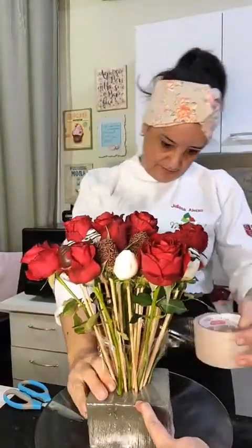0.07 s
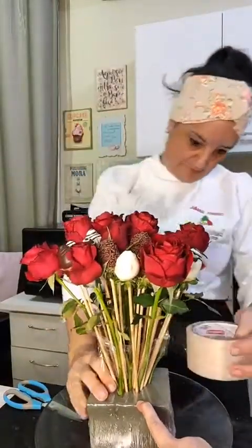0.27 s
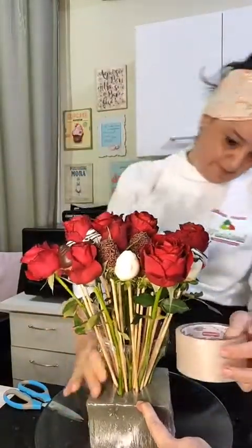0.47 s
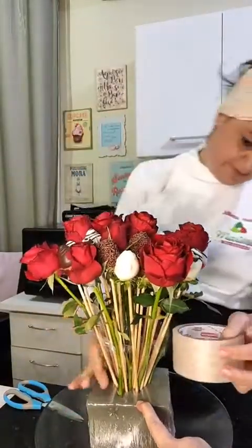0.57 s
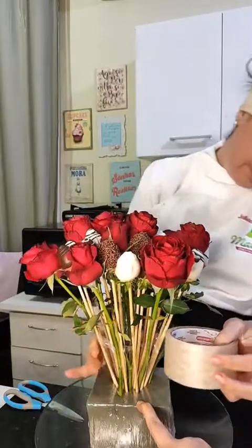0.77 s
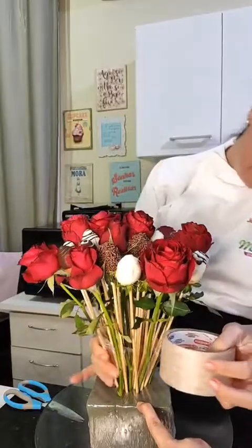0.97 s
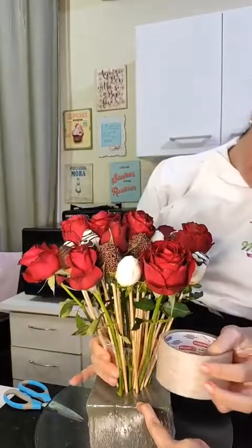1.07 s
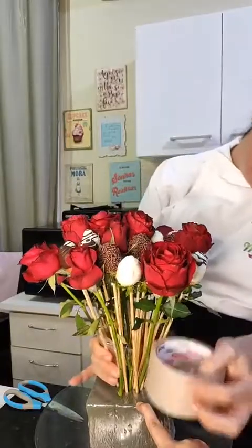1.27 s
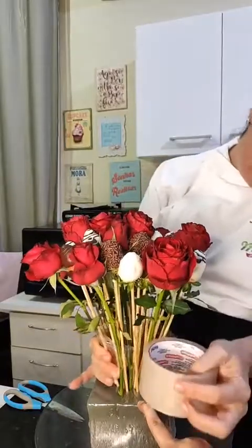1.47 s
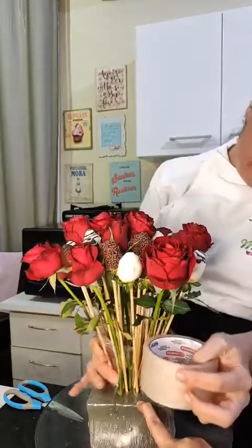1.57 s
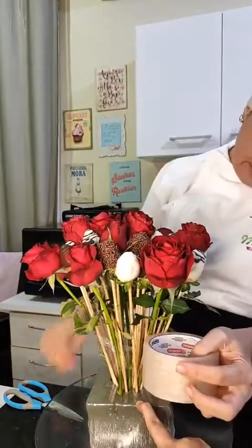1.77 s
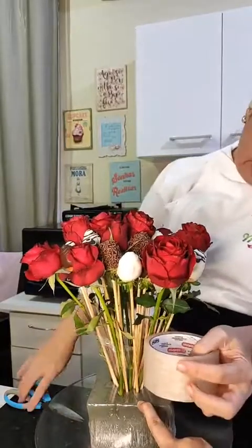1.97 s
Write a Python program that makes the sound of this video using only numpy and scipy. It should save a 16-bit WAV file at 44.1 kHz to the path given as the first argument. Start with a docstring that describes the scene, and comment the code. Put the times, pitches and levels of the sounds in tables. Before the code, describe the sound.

Wide sticky tape is already being yanked off its roll, a loud raspy rip, then light crinkling, ticks and rubbing on stems, then a second harsh rip and faint rustle, close microphone in a reverberant kitchen.

```python
"""Tape pulled off its roll

Wide adhesive tape is jerked off its roll twice, close by in a hard-walled kitchen.
Stick-slip of the glue: every slip plucks the taut film, booms in the roll and sprays a crackle.
Between and after the pulls the tape is laid round a bunch of stems: ticks, squeaks, grainy rustle.
Early copies, diffuse tails and standing waves give the room, over quiet air and a faint rumble."""
import sys
import numpy as np
from scipy import signal
from scipy.fft import rfft, irfft, next_fast_len
from scipy.io import wavfile
from scipy.ndimage import map_coordinates

SR = 44100
rng = np.random.default_rng(int(sys.argv[2]) if len(sys.argv) > 2 else 0)


def wav_out(sig):
    """Save sig, one row per channel (or a flat mono array), as 16-bit PCM at SR to the path in sys.argv[1]."""
    wavfile.write(sys.argv[1], SR, np.round(np.clip(np.atleast_2d(sig).T, -1, 1) * 32767).astype(np.int16))


N = 88376
LEAD = SR // 10  # samples computed ahead of the output
TIME = np.arange(-LEAD, N + SR // 2) / SR  # s
AGE = np.arange(SR // 8) / SR  # s since the start of one event

# modes of the taut film: (ratio to base pitch, level [dB], t60 [s])
FILM_MODES = [(0.96, -1, 0.011), (0.665, -13.5, 0.0087)]


def amp(db):
    """Decibels to gain."""
    return 10 ** (np.asarray(db) / 20)


def unit(x):
    """Scale to rms 1."""
    return x / np.sqrt(np.mean(x ** 2) + 1e-20)


def noise():
    """White noise over the whole time axis."""
    return rng.standard_normal(len(TIME))


def along(points, hz):
    """Interpolate (frequency [Hz], value) points on a log axis."""
    f, v = np.transpose(points)
    return np.interp(np.log(hz + 1), np.log(f + 1), v)


def fade(t, t60):
    """Exponential decay by 60 dB in t60."""
    return np.exp(-np.log(1000) * t / t60)


def add(track, s, sound):
    """Mix a sound into a track at time s."""
    track[max(0, LEAD + round(s * SR)):][:len(sound)] += sound


def coloured(x, points):
    """Minimum-phase filter, by folded cepstrum, with the gain of (frequency [Hz], gain [dB]) points."""
    size = 4096
    gain_db = along(points, np.fft.rfftfreq(size, 1 / SR))
    cepstrum = irfft(np.log(amp(gain_db)))
    cepstrum[1:size // 2] *= 2
    cepstrum[size // 2 + 1:] = 0
    impulse = irfft(np.exp(rfft(cepstrum)))
    return signal.fftconvolve(x, impulse)[:len(x)]


def air():
    """Steady room air: coloured noise."""
    level_db = -52
    # air spectrum: (frequency [Hz], gain [dB])
    air_colour = [(20, 17.5), (70, 1), (200, 3.5), (420, 0.5), (650, -8.5), (1200, -12), (2500, -25.5),
                  (11000, -48), (16000, -28)]
    return amp(level_db) * unit(coloured(noise(), air_colour))


def rumble():
    """Faint low rumble, a narrow noise band, swells between the pulls."""
    centre_s, width_s, centre_hz, level_db = .98, .12, 63, -58
    band = signal.butter(2, centre_hz * amp([-1, 1]), "band", fs=SR, output="sos")
    swell = np.exp(-((TIME - centre_s) / width_s) ** 2)
    return amp(level_db) * swell * unit(signal.sosfilt(band, noise()))


def nearby(x, count=24):
    """Early copies from the things on the table: random taps of either sign."""
    first_s, spread_s = .002, .012
    taps, draws = np.zeros(len(AGE)), rng.random((count, 2))
    arrivals = (SR * (first_s + spread_s * draws[:, 0])).astype(int)
    np.add.at(taps, arrivals, draws[:, 1] - .5)
    return signal.fftconvolve(x, taps / np.linalg.norm(taps))[:len(x)]


def wall_tail():
    """One diffuse response of the kitchen: noise whose decay time depends on frequency."""
    delay_s, build_s = 0.007, 0.0013
    # reverberation: (frequency [Hz], t60 [s])
    room_t60 = [(100, 0.51), (350, 0.85), (1200, 0.66), (8000, 0.49), (15000, 0.27)]
    hz, t, z = signal.stft(rng.standard_normal(SR), SR, nperseg=256)
    decay = fade(t, along(room_t60, hz)[:, None])
    tail = signal.istft(z * decay, SR, nperseg=256)[1]
    since_delay_s = np.maximum(np.arange(len(tail)) / SR - delay_s, 0)
    tail = tail * (1 - np.exp(-since_delay_s / build_s))
    return tail / np.linalg.norm(tail)


def room(x, count=5):
    """Diffuse reverberation: overlapping slices take turns through random tails, for a less tonal decay."""
    slice_s = .015
    # reverberation spectrum: (frequency [Hz], gain [dB])
    room_colour = [(200, -2), (370, -5.5), (650, -6), (1300, -2.5), (1700, -5.5), (3000, 2), (14000, -2.5)]
    wet = np.zeros(len(x))
    for k in range(count):
        distance = np.abs((TIME / slice_s - k) % count - 1)
        share = np.sqrt(np.maximum(0, 1 - distance))
        wet += signal.fftconvolve(x * share, wall_tail())[:len(x)]
    return coloured(wet, room_colour)


def standing(pulls):
    """Standing waves of the kitchen store the energy of each pull and ring on with drifting phase."""
    t60_s, width_hz = 0.66, 1.2
    # room modes: (frequency [Hz], level in first pull [dB], level in second pull [dB])
    room_modes = [(360.6, -18, -19), (497.3, -32, -16), (604, -58, -13.5), (801.6, -19, -20),
                  (1202, -19, -9.5), (1220, -14.5, -14), (1334, -9.5, -31.5), (1400, -25, -20),
                  (2968, -20.5, -14.5)]
    mode_hz, *levels_db = np.transpose(room_modes)
    memory = fade(TIME - TIME[0], t60_s) ** 2  # decay of energy
    memory /= memory.sum()
    out = np.zeros(len(TIME))
    for x, pull_db in zip(pulls, levels_db):
        stored = np.sqrt(np.abs(signal.fftconvolve(x ** 2, memory)[:len(x)]))
        for hz, db in zip(mode_hz, pull_db):
            drift = np.cumsum(noise()) * np.sqrt(2 * np.pi * width_hz / SR)
            out += stored * amp(db) * np.sin(2 * np.pi * hz * TIME + drift)
    return out


def ring(hz, t60):
    """One decaying mode with a soft attack."""
    attack_s = 0.00096
    return np.cos(2 * np.pi * hz * AGE) * fade(AGE, t60) * (1 - np.exp(-AGE / attack_s))


def pluck(hz, modes):
    """A body rings, at a slightly different tension each time; it radiates no steady pressure."""
    pitch_scatter = 0.052  # standard deviation of log pitch
    wave = np.zeros(len(AGE))
    for ratio, db, t60 in modes:
        mode_hz = hz * ratio * np.exp(pitch_scatter * rng.normal())
        wave += amp(db) * ring(mode_hz, t60)
    return signal.sosfilt(signal.butter(3, hz / 2, "high", fs=SR, output="sos"), wave)


def crackle(t60):
    """Glue threads snapping: spiky noise with a fast rise and exponential decay."""
    rise_s, spikes = .0006, .52  # spikes: standard deviation of log gain
    spike_gain = np.exp(spikes * rng.standard_normal(len(AGE)))
    snaps = unit(rng.standard_normal(len(AGE)) * spike_gain)
    return snaps * fade(AGE, t60) * (1 - np.exp(-AGE / rise_s))


def rubbing():
    """Friction of the tape on stems and leaves: two noise bands sharing one random grain."""
    grain_db, grain_hz = 5.3, 463
    # rubbing: (time [s], level of film hum [dB], level of treble hiss [dB])
    strokes = [(0.46, -54, -63.5), (0.519, -48.5, -49), (.6, -58, -58.5), (0.721, -54, -53),
               (.86, -56.5, -51.5), (.93, -53.5, -53), (1.18, -54, -53), (1.27, -58, -63), (1.66, -68, -51),
               (1.683, -50, -43), (1.72, -54.5, -54.5), (1.8, -57.5, -62), (1.899, -62, -73),
               (1.943, -64, -55.5), (2.0, -61, -71)]
    # hum spectrum: (frequency [Hz], gain [dB])
    hum_colour = [(300, -58), (900, 6.5), (1400, 8.5), (1900, -9), (8000, -35)]
    # hiss spectrum: (frequency [Hz], gain [dB])
    hiss_colour = [(500, 3.5), (2400, -1.5), (6200, -4), (7600, 1.5), (9300, -1.5), (11000, -10.5),
                   (15500, -5)]
    s, hum_db, hiss_db = np.transpose(strokes)
    knots = (TIME - TIME[0]) * grain_hz
    grain = amp(grain_db * map_coordinates(rng.standard_normal(len(AGE)), [knots], mode="wrap"))

    def layer(colour, db):
        """Grainy coloured noise following the level points."""
        return amp(np.interp(TIME, s, db)) * unit(coloured(grain * noise(), colour))

    return layer(hum_colour, hum_db) + layer(hiss_colour, hiss_db)


def ticks():
    """Single small slips and crinkles: a film pluck with two colours of crackle."""
    film_hz = 1238  # base pitch
    # events: (time [s], film [dB], crackle before colouring [dB], sizzle before colouring [dB],
    #          t60 of crackle and sizzle [s])
    tick_events = [(0.498, -25.5, -31, -41.5, 0.04), (.511, -23, -36.5, -49, 0.087),
                   (0.718, -34, -41.5, -41, 0.039), (0.758, -33, -34.5, -40.5, 0.063),
                   (0.77, -22.5, -23.5, -30.5, 0.016), (.823, -19.5, -32, -40.5, 0.026),
                   (.944, -23.5, -36, -45, 0.013), (0.962, -48, -65, -41.5, 0.05),
                   (1.034, -26, -42, -46, 0.027), (1.053, -25.5, -30.5, -53, 0.012),
                   (1.100, -20.5, -31, -45, 0.039), (1.153, -44, -40.5, -41, 0.095),
                   (1.23, -25, -37.5, -51, 0.019), (1.243, -23.5, -39, -55, 0.013),
                   (1.910, -39, -38, -51, 0.028)]
    # crackle spectrum: (frequency [Hz], gain [dB])
    tick_colour = [(100, -6), (600, -7.5), (1100, 12), (2000, 4), (2600, -2.5), (7500, -4), (11000, -7.5),
                   (15500, -21)]
    # sizzle spectrum: (frequency [Hz], gain [dB])
    sizzle_colour = [(2000, -20), (8000, 8), (11500, -0.5), (15500, 6)]
    body, spray, sizzle = np.zeros((3, len(TIME)))
    for s, film_db, crackle_db, sizzle_db, t60 in tick_events:
        add(body, s, amp(film_db) * pluck(film_hz, FILM_MODES))
        add(spray, s, amp(crackle_db) * crackle(t60))
        add(sizzle, s, amp(sizzle_db) * crackle(t60))
    return body + coloured(spray, tick_colour) + coloured(sizzle, sizzle_colour)


def squeaks():
    """The film skids for an instant on a stem: decaying narrow-band noise."""
    t60_s = .02
    # squeaks: (time [s], centre frequency [Hz], level before decay [dB])
    skids = [(0.617, 7100, -40), (1.687, 6600, -37.5)]
    out = np.zeros(len(TIME))
    for s, hz, db in skids:
        band = signal.butter(1, hz * amp([-.5, .5]), "band", fs=SR, output="sos")
        tone = unit(signal.sosfilt(band, rng.standard_normal(len(AGE))))
        add(out, s, amp(db) * tone * fade(AGE, t60_s))
    return out


def jolts():
    """Dull thumps of the roll jolting in the hand: low decaying modes."""
    # jolts: (time [s], level [dB], frequency [Hz], t60 [s])
    thumps = [(0.065, -38, 110, 0.36), (0.065, -18.5, 38, 0.032), (1.347, -25.5, 62, 0.032)]
    out = np.zeros(len(TIME))
    for s, db, hz, t60 in thumps:
        add(out, s, amp(db) * ring(hz, t60))
    return out


def pull(rows, roll_hz):
    """Stick-slip: the integrated slip rate times the slips, each with film, roll boom and crackle."""
    jitter_s, scatter_db = .0002, .8
    crackle_t60_s, crackle_low_hz = .016, 380  # high-pass corner: thin crackle, the roll carries the lows
    # modes of the roll: (ratio to base pitch, level [dB], t60 [s])
    roll_modes = [(0.88, -7.5, 0.033), (0.813, -8, 0.022), (0.605, -8.5, 0.037)]
    # crackle spectrum: (frequency [Hz], gain [dB])
    crackle_colour = [(250, -10), (620, -11.5), (830, 14), (1600, 9.5), (2100, 13), (2550, 3.5), (2950, 10),
                      (3400, 4), (7800, 4.5), (9600, 3.5), (10800, -4), (15500, -0.5)]
    s, rate_hz, *controls = np.transpose(rows)
    t = np.arange(s[0], s[-1], 1 / SR)
    slip_count = np.cumsum(np.interp(t, s, rate_hz)) / SR
    slip_times = np.interp(np.arange(np.ceil(slip_count[-1])), slip_count, t)
    body, spray = np.zeros((2, len(TIME)))
    for at in slip_times:
        film_db, film_hz, crackle_db, roll_db = (np.interp(at, s, c) for c in controls)
        at = at + jitter_s * rng.normal()
        size = amp(scatter_db * rng.normal())
        film = amp(film_db) * pluck(film_hz, FILM_MODES)
        boom = amp(roll_db) * pluck(roll_hz, roll_modes)
        add(body, at, size * (film + boom))
        add(spray, at, size * amp(crackle_db) * crackle(crackle_t60_s))
    high_pass = signal.butter(2, crackle_low_hz, "high", fs=SR, output="sos")
    return body + coloured(signal.sosfilt(high_pass, spray), crackle_colour)


def scene():
    """Pulls and handling in the room, over its quiet air."""
    early_db, room_db = -9, -3
    # Pulls: (time [s], slip rate [1/s], film level [dB], film base pitch [Hz],
    #         crackle before colouring [dB], roll boom level [dB])
    # tape already moving at the start
    easing = [(-.06, 130, -7, 1250, -18, -24), (.012, 150, -11, 1250, -27, -26)]
    # first jerk, same columns
    first_jerk = [(0.0183, 102.6, 5.5, 1200, -10.5, -14.5), (.037, 117, 3.5, 1360, -15, -16),
                  (.0635, 145.4, -8, 1310, -18, -24.5), (.067, 299.5, -20, 1170, -8, -11),
                  (.078, 257.1, -1, 1393, -21.5, -19), (0.093, 199.6, -4, 1355, -19, -28),
                  (0.114, 156.7, -6, 1410, -20, -22.5)]
    # second jerk, same columns
    second_jerk = [(1.2832, 106.8, 1, 1330, -16, -18.5), (1.293, 121.1, -5.5, 1370, -10.5, -16.5),
                   (1.316, 129.1, 3.5, 1570, -12, -21), (1.321, 216.9, -2.5, 1450, -10, -27),
                   (1.344, 244.5, -3, 1563, -18, -11.5), (1.359, 220.2, -3.5, 1230, -11.5, -10),
                   (1.378, 245.1, -17, 1240, -20.5, -27.5), (1.443, 237.6, -12.5, 1224, -43, -35)]
    # base pitch of the roll: (first pull [Hz], second pull [Hz])
    roll_hz = (407, 605)
    background = air() + rumble()
    first = pull(easing, roll_hz[0]) + pull(first_jerk, roll_hz[0])
    second = pull(second_jerk, roll_hz[1])
    tape = rubbing() + ticks() + squeaks() + first + second
    reflections = amp(early_db) * nearby(tape) + amp(room_db) * room(tape)
    mix = tape + jolts() + reflections + standing([first, second]) + background
    return mix[None, LEAD:LEAD + N]


def record(dry):
    """Round off the highest peaks, then cut everything above the band limit."""
    ceiling, top_hz = .95, 15950
    x = dry / (1 + np.abs(dry / ceiling) ** 6) ** (1 / 6)
    size = next_fast_len(N + SR // 2)
    passed = np.fft.rfftfreq(size, 1 / SR) < top_hz
    return irfft(rfft(x, size) * passed, size)[:, :N]


dry = scene()
out = record(dry)
wav_out(out)
```